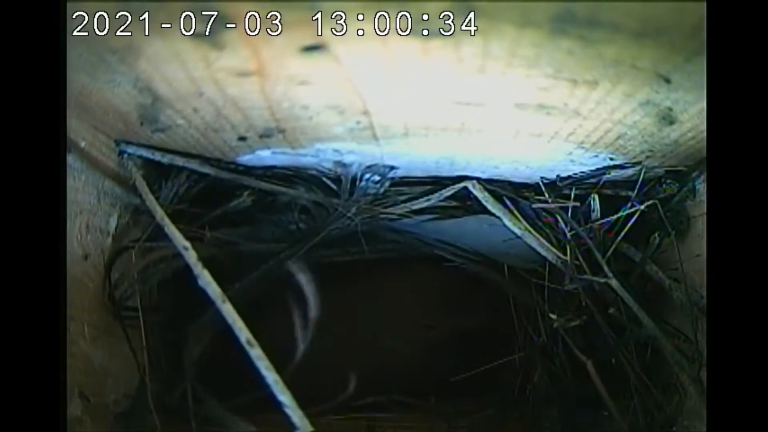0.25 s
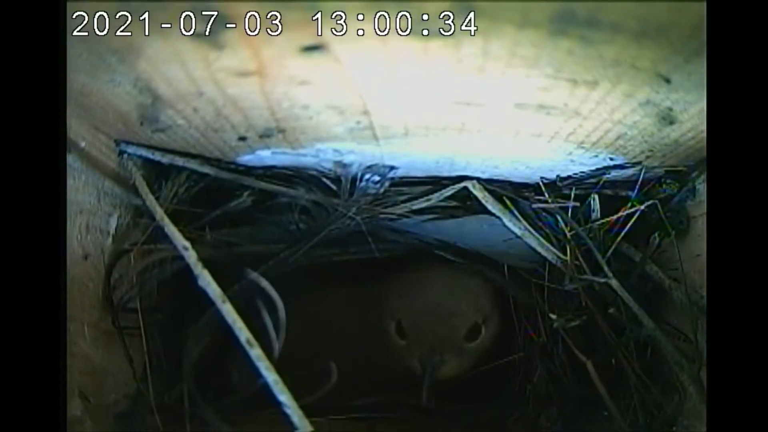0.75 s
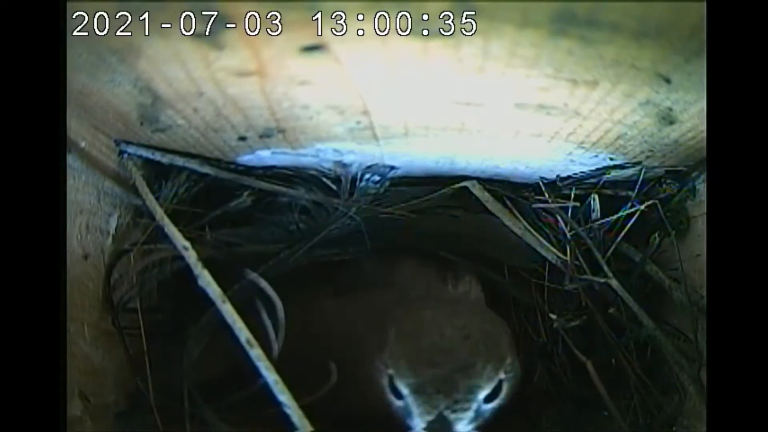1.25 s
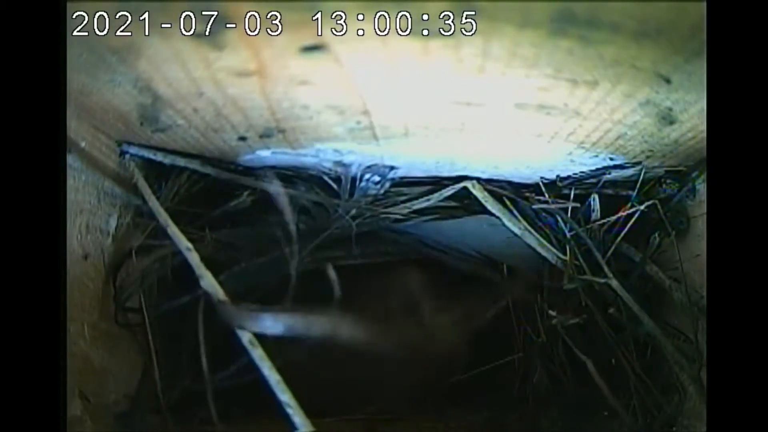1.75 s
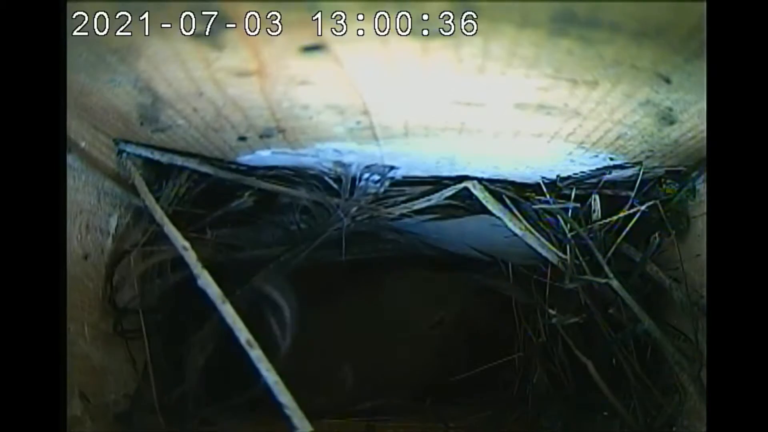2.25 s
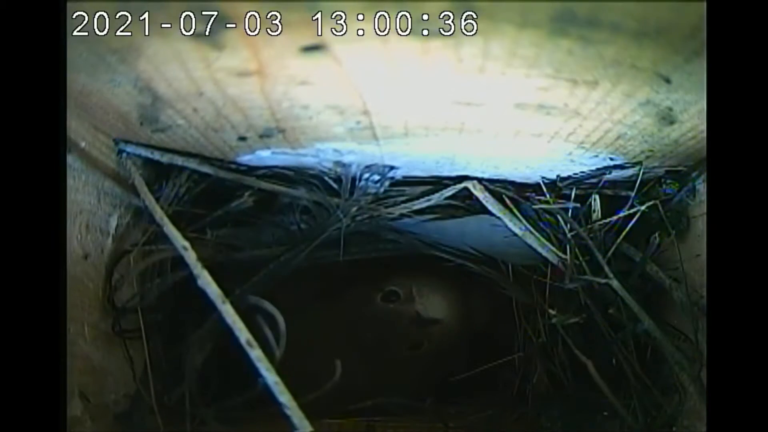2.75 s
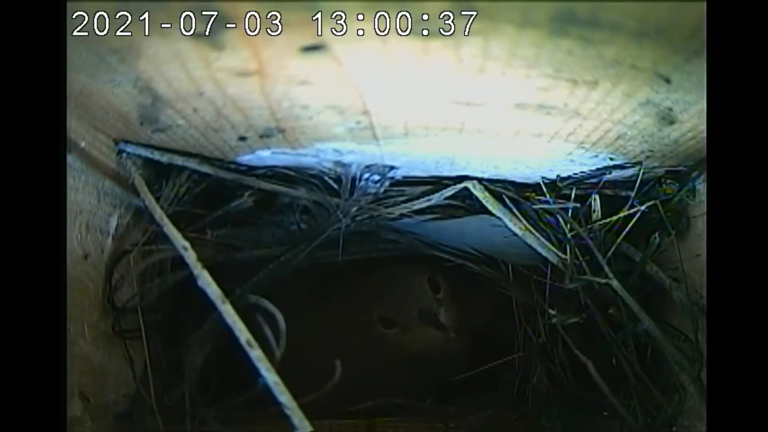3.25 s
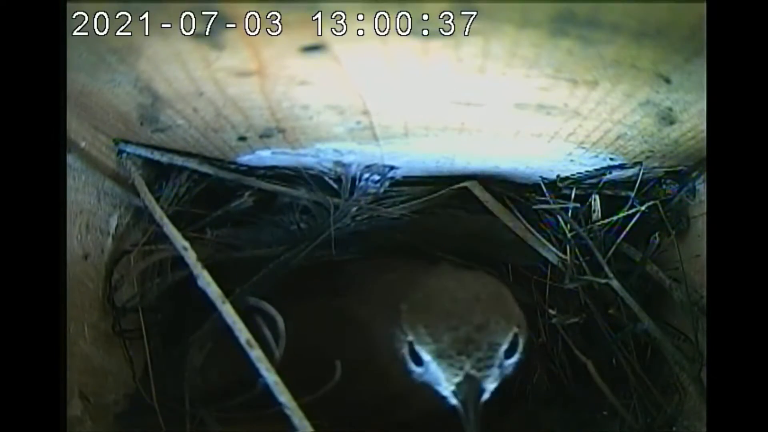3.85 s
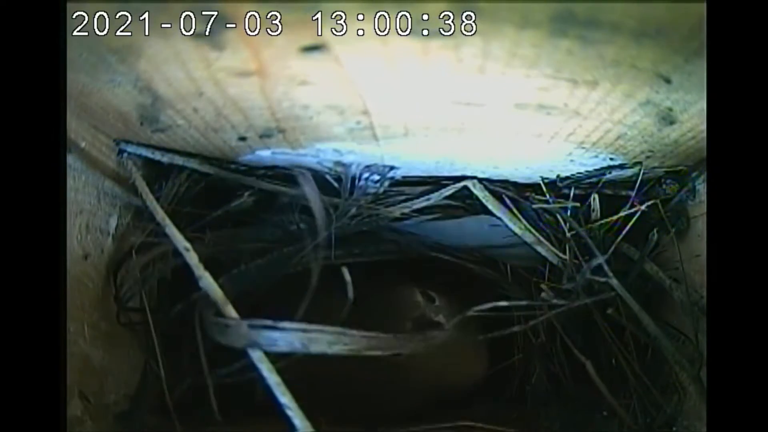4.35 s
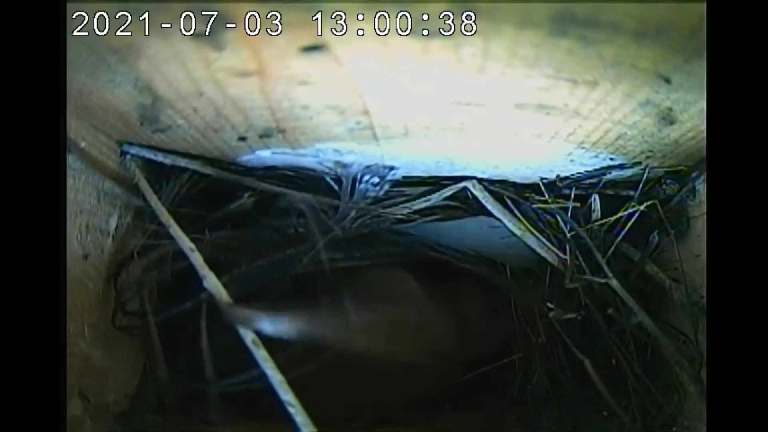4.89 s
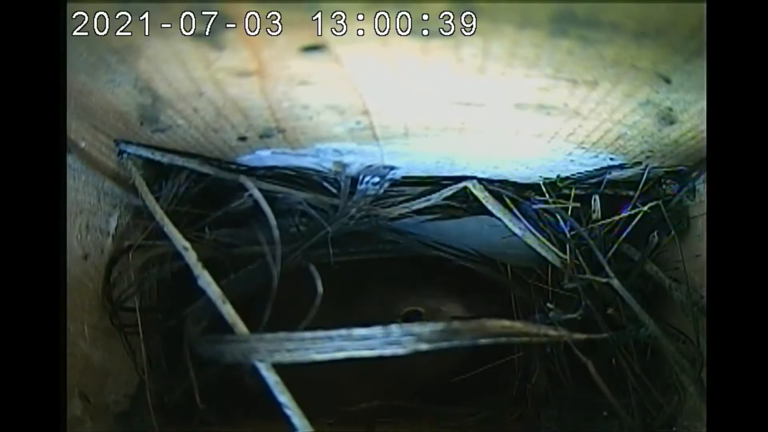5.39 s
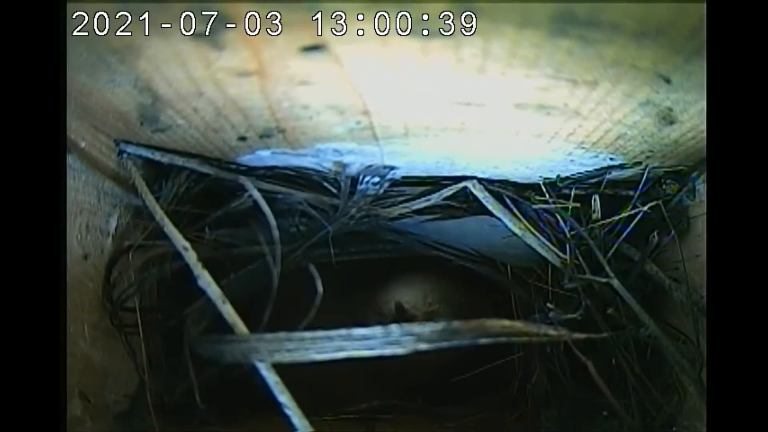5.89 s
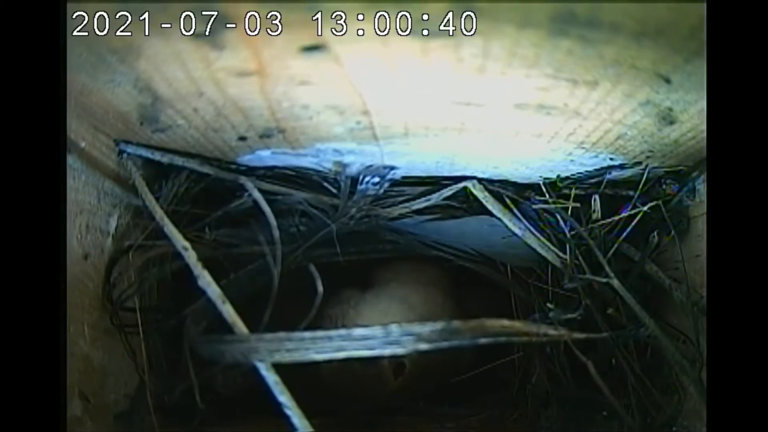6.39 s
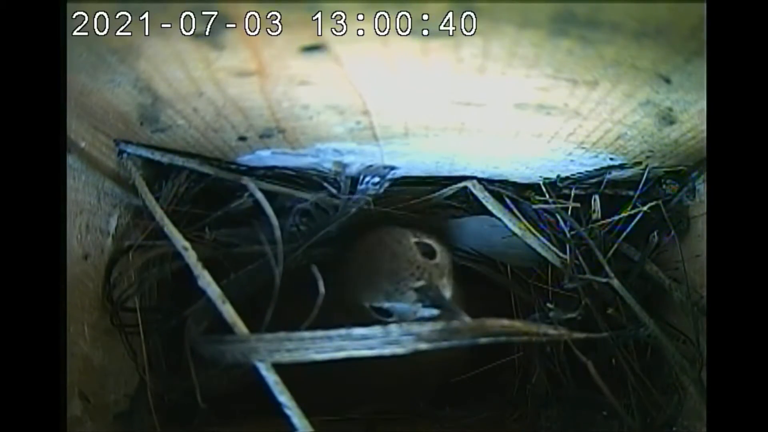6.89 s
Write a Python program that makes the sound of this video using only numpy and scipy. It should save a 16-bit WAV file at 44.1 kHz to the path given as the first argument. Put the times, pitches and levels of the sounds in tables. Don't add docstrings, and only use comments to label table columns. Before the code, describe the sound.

A low steady electrical buzz, very thin high whine, dull rumble and soft hiss run throughout, picked up by a small microphone inside a wooden nest box; the left side dominates and the right is only a faint leak. From 0 to 0.3 s dry straw scrapes, crackles and taps the walls, then almost nothing but a tiny rustle near 0.65. From 1.5 to 2.4 s a busier bout of hollow thuds, ticks and snaps ends with a sharp stalk break. At 2.45 s a wren outside begins hoarse churrs, then quick varied chatter and squeaks. From 3.7 s it grows loud: wavering warbles alternate with clear piercing whistles, then a rapid even trill from 4.3 to 4.9 and two warbled, rising closing phrases until about 5.2. Straw crackles beneath from 4.2 to 5.4, with strong taps around 5. Short ringing and a garden tail fade; faint ticks follow near 5.65 and 6.75-6.95, over the hum.

```python
import sys
import numpy as np
from scipy import signal
from scipy.fft import rfft, irfft, next_fast_len
from scipy.io import wavfile
from scipy.ndimage import uniform_filter1d, map_coordinates

SR = 44100
rng = np.random.default_rng(int(sys.argv[2]) if len(sys.argv) > 2 else 0)


def volts_from_db(level):
    exponent = np.asarray(level, float) / 20
    return 10 ** exponent


def materialize(psi):
    bounded = np.clip(np.atleast_2d(psi).T, -1, 1)
    quanta = np.round(bounded * 32767).astype(np.int16)
    wavfile.write(sys.argv[1], SR, quanta)


N = 314433


def unit(x):
    return x / np.sqrt(np.mean(x ** 2) + 1e-20)


def along(points, hz):
    f, v = np.transpose(points)
    return np.interp(np.log(hz + 1), np.log(f + 1), v)


def wobble(rate, size=N):
    knots = rng.standard_normal(int(size * rate / SR) + 4)
    return map_coordinates(knots, [np.arange(size) * rate / SR])


def filtered(x, response):
    m = next_fast_len(N + SR // 2)
    return irfft(rfft(x, m) * response(np.fft.rfftfreq(m, 1 / SR)), m)[..., :N]


# [f/Hz, width/Hz, level/dB]
BOX = [(307.4, 44.3, 3), (539.5, 30.8, 6), (1346, 108.8, 6.5), (2014.4, 53.1, 16.5), (3092, 249, 2.5),
       (4512, 63.3, 7.5), (6288, 63, -8.5), (11050, 129, -33.5), (10870, 550, -24)]


def box(f, widen):
    total = 0
    for k, (c, width, db) in enumerate(BOX):
        damping = 1j * f * width * widen
        total = total + (-1) ** k * volts_from_db(db) * damping / (c * c - f * f + damping)
    return total


# [t/s, length/s, crackle level/dB, push level/dB]
STRAW = [(0, 0.0248, -50, -49.5), (0.007, 0.271, -55, -52.5), (0.2, 0.0333, -50, -42),
         (0.231, 0.0467, -51, -53), (1.53, 0.0755, -50.5, -51), (1.589, 0.088, -54.5, -49),
         (1.679, 0.132, -67.5, -57.5), (1.728, 0.0462, -50.5, -45.5), (1.767, 0.0795, -54, -49.5),
         (1.847, 0.104, -52, -49.5), (1.927, 0.144, -52, -49), (2.054, 0.1437, -51.5, -50.5),
         (2.227, 0.0534, -59, -60), (2.258, 0.075, -50, -49), (2.351, 0.0237, -52, -53.5),
         (2.363, 0.0279, -41.5, -42), (2.386, 0.0432, -55.5, -48.5), (2.487, 0.046, -79, -49),
         (4.23, 0.0255, -46.5, -46), (4.257, 0.055, -54, -59.5), (4.309, 0.0776, -49.5, -45.5),
         (4.373, 0.076, -71, -56.5), (4.473, 0.0408, -52.5, -45.5), (4.514, 0.097, -57, -46.5),
         (4.61, 0.053, -75, -70), (4.708, 0.0498, -53.5, -47), (4.762, 0.0419, -47, -43.5),
         (4.82, 0.084, -55.5, -50.5), (4.896, 0.0296, -51, -53), (4.928, 0.1155, -49, -47),
         (5.042, 0.2065, -53.5, -54.5), (5.237, 0.0627, -50, -53.5), (5.3, 0.139, -69, -67.5),
         (5.633, 0.052, -65.5, -57.5), (0.652, 0.068, -65, -59.5), (6.74, 0.069, -71.5, -60)]


def straw():
    strokes = np.zeros((2, N))
    for s, length, crackle_db, push_db in STRAW:
        swell = signal.windows.tukey(int(1.35 * length * SR), .3)
        swell = swell * volts_from_db(2.5 - 17 * np.linspace(0, 1, len(swell)) ** 2)
        start = round(s * SR)
        strokes[:, start:start + len(swell)] += swell * volts_from_db([[crackle_db], [push_db]])
    clumps = volts_from_db(2 * wobble(45) + 2.2 * wobble(200))
    thud = filtered(clumps * rng.standard_normal(N), lambda f: box(f, 1.424) / (1 + (f / 750) ** 6))
    contacts = (rng.random((2, N)) < .1) * rng.standard_normal((2, N))
    thick, thin = contacts * volts_from_db(1.5 * rng.exponential(size=(2, N)))
    grains = filtered(thick, lambda f: f < 3700) + filtered(thin, lambda f: f >= 3700)

    def against_walls(f):
        low_cut = (f / 1150) ** 6 / (1 + (f / 1150) ** 6)
        return box(f, 3.83) * low_cut + volts_from_db(-13.5)

    crackle = filtered(clumps * grains, against_walls)
    return strokes[0] * unit(crackle) + strokes[1] * unit(thud)


# [f/Hz, level/dB per Hz]
AIR_SPECTRUM = [(12, -37.5), (20, -4), (49, -16.5), (123, -2.5), (300, -4.5), (408, -14.5), (539, -12),
                (942, -29),
                (2370, -24.5), (3400, -36.5), (8090, -37.5), (9560, -39.5), (12600, -37.5), (13700, -43.5),
        (14800, -30.5), (15800, -23.5)]


def air():
    z = signal.stft(rng.standard_normal(N), nperseg=512)[2]
    over_hz = uniform_filter1d(rng.standard_normal(z.shape), 6, 0)
    patches = unit(uniform_filter1d(over_hz, 14, 1))
    noise = signal.istft(z * volts_from_db(1.86 * patches), nperseg=512)[1][:N]

    def colour(f):
        ringing = volts_from_db(-0.5) * np.abs(box(f, 0.74)) * (f > 3500)
        return volts_from_db(along(AIR_SPECTRUM, f)) * (1 + ringing)

    return volts_from_db(-51) * volts_from_db(.5 * wobble(3)) * unit(filtered(noise, colour))


# [f/Hz, rms level of a line/dB]
BUZZ = [(60, -54), (120, -55.5), (300, -67.5), (600, -80), (1500, -84), (4000, -97.5), (9000, -112)]
# [f/Hz, rms level of a line/dB]
SIZZLE = [(9000, -104), (12800, -99), (13700, -89), (14300, -92), (14700, -89), (15300, -83.5),
          (15450, -79), (15800, -86)]
# [multiple of the field rate, rms level/dB]
WHISTLE_LINES = [(131.25, -86.5), (261.5, -68), (262.5, -63)]
EDGES = (.45, .75)
TOP_HZ = 15790


def picture():
    field_hz, steps = 59.878, 2 ** 15
    half = np.arange(int(2 * TOP_HZ / field_hz)) / 2
    hz = half * field_hz
    first, second = np.exp(-2j * np.pi * np.outer(EDGES, half))
    buzz = volts_from_db(along(BUZZ, hz)) * (first - 0.177 * second)
    sizzle = volts_from_db(along(SIZZLE, hz)) * (first + 1.48 * second)
    lines = np.where(half % 1 == 0, buzz, sizzle)
    lines[0] = 0
    frame = irfft(lines, steps) * steps / np.sqrt(2) / 1.312
    fields = field_hz * np.arange(N) / SR + .0003 * wobble(12)
    leak = np.interp(fields / 2 % 1 * steps, np.arange(steps), frame)
    for k, db in WHISTLE_LINES:
        leak += np.sqrt(2) * volts_from_db(db) * np.cos(2 * np.pi * k * (fields - .6))
    return leak * volts_from_db(.4 * wobble(4))


def right_hiss():
    return volts_from_db(-102) * filtered(rng.standard_normal(N), lambda f: (f / 7000) ** 2 / (1 + (f / 11000) ** 8))


# [t/s, peak level/dB]
TICKS = [(0.0159, -45.5), (0.0613, -43.5), (0.0987, -38), (0.1997, -32), (0.2402, -34), (0.6634, -54.5),
         (0.9456, -49), (1.5652, -47.5), (1.5731, -27), (1.5998, -34), (1.627, -41.5), (1.6588, -46),
         (1.8634, -39), (1.922, -38.5), (1.944, -31.5), (1.9689, -35.5), (1.9985, -36.5), (2.0167, -42.5),
         (2.0867, -35.5), (2.124, -35), (2.143, -35.5), (2.2115, -38), (2.2754, -35), (2.2921, -32.5),
         (2.3933, -32), (4.4938, -34.5), (4.9044, -41), (4.9275, -29), (5.0253, -25.5), (5.0881, -23),
         (5.2675, -33), (5.6224, -50.5), (5.6752, -55.5), (6.7408, -53), (6.8034, -51), (6.9586, -47)]


def taps():
    level_db, t60_s = -3, .009
    t = np.arange(400) / SR
    bursts = np.zeros(N)
    for s, db in TICKS:
        tap = volts_from_db(db + level_db - 60 * t / t60_s) * rng.standard_normal(len(t))
        bursts[round(s * SR):][:len(t)] += tap
    return filtered(bursts, lambda f: box(f, 7) * np.clip(f / 3300, 0, 1) ** 1.5)


# [t/s, peak level/dB, body
# level/dB]
SNAPS = [(0.2107, -50.5, 8.5), (1.539, -56, 4), (1.731, -47, 16.5), (1.7834, -49.5, 21.5),
         (1.8795, -49, 24.5), (2.3634, -45, -1.5), (2.3813, -41.5, 16), (3.108, -47, -9),
         (3.679, -41.5, -20), (3.8017, -38, -30.5), (4.033, -49.5, -2.5), (4.2366, -39.5, -15.5),
         (4.483, -38, -11.5), (4.6445, -56.5, 0), (4.7207, -37.5, -10), (4.7771, -48, 3.5),
         (5.252, -61.5, 11), (5.39, -58.5, 18.5)]


def snaps():
    t60_s = 0.0227
    t = np.arange(400) / SR
    direct, body = np.zeros((2, N))
    for s, db, body_db in SNAPS:
        burst = volts_from_db(db - 60 * t / t60_s) * rng.standard_normal(len(t))
        direct[round(s * SR):][:len(t)] += volts_from_db(-3) * burst
        body[round(s * SR):][:len(t)] += volts_from_db(body_db - 8.5) * burst
    return direct + filtered(body, lambda f: box(f, 0.76))


# [t/s, peak level/dB, f/Hz]
STALK = (2.3652, -20, 4300)


def breaking_stalk():
    s, db, hz = STALK
    t = np.arange(400) / SR
    out = np.zeros(N)
    ping = np.sin(2 * np.pi * hz * t * (1 - 58 * t))
    out[round(s * SR):][:len(t)] += volts_from_db(db - 60 * t / .008) * ping
    return out


# [f/Hz, width/Hz, level/dB]
PASSAGE = [(1400, 300, -9), (2050, 500, 0), (2950, 450, -.5), (4380, 400, 3), (6350, 450, 3)]


def syllable(shape, hoarse, strongest=1, fall_db=35, throb=0):
    passage_top_hz, reach_db, round_ms, harmonics = 7800, 45, 1.8, 6
    ms, hz, level_db = np.array(shape).T
    t = np.arange(int(ms[-1] * SR / 1000)) * 1000 / SR
    size = len(t)
    glide = uniform_filter1d(np.interp(t, ms, hz), size=int(round_ms * SR / 1000))
    k = np.arange(1, min(harmonics, strongest + reach_db / fall_db) + .01)[:, None]
    f = k * glide
    passage = sum(volts_from_db(db) / (1 + ((c * c - f * f) / (f * w)) ** 2) for c, w, db in PASSAGE)
    share = volts_from_db(-fall_db * np.abs(k - strongest)) * passage
    share = share / (1 + (f / passage_top_hz) ** 16)
    share = share / np.linalg.norm(share, axis=0)
    pitch = glide * (1 + rng.normal(0, 0.00613) + 0.0808 * hoarse * wobble(514.8, size))
    roughness = np.array([wobble(600, size) for _ in k])
    shaken = 1 + hoarse * roughness + .11 * wobble(1800, size)
    phase = 2 * np.pi * np.cumsum(pitch) / SR
    tone = volts_from_db(np.interp(t, ms, level_db)) * np.sum(share * shaken * np.sin(k * phase), axis=0)
    beat = 1 + throb * np.sin(2 * np.pi * 105 * t / 1000 + .5 * wobble(33.5, size))
    fade = np.clip(np.minimum(t - ms[0], ms[-1] - t) / 2, 0, 1)
    return np.sqrt(2) * tone * beat * fade


def garden_tail(dry):
    t = np.arange(SR // 4) / SR
    t60_s = np.array([[.02], [.2]])
    walls, garden = rng.standard_normal((2, len(t))) * volts_from_db(-60 * t / t60_s)
    tail = volts_from_db(-14) * walls / np.linalg.norm(walls) + volts_from_db(-25) * garden / np.linalg.norm(garden)
    return signal.fftconvolve(dry, tail)[:N]


# [t/ms, f/Hz, level/dB]
CHURR = [(0, 860, -63), (25, 930, -51), (46, 1000, -45), (65, 940, -63)]
LONG_CHURR = [(0, 880, -64), (14, 940, -49), (92, 980, -47), (102, 1090, -46), (118, 1070, -58)]
CHUCK = [(0, 1500, -62), (10, 1600, -45), (19, 1330, -48), (25, 1020, -45), (30, 850, -47), (36, 680, -56)]
ARCH = [(0, 1150, -60), (9, 1300, -57), (16, 1600, -52), (24, 1950, -47), (32, 2150, -45), (40, 2080, -44),
        (52, 1800, -43), (60, 1750, -64)]
ARCH_TOP = [(28, 6150, -62), (36, 6150, -56), (41, 6190, -52), (45, 6000, -57), (50, 5600, -53),
            (57, 4970, -53), (64, 4660, -66)]
HOOK = [(0, 600, -59), (8, 810, -43), (12, 790, -41), (19, 690, -43), (24, 750, -50), (31, 710, -46),
        (40, 690, -59)]
FLICK = [(0, 1480, -70), (8, 4300, -55), (11, 4900, -45), (22, 4350, -49), (34, 4150, -57)]
RASP = [(0, 1570, -57), (10, 1550, -46), (30, 1550, -44.5), (38, 1320, -44), (43, 1380, -44),
        (52, 1160, -51)]
PIP = [(0, 1900, -61), (6, 1970, -41), (12.5, 2060, -37), (19, 2000, -44), (24, 2000, -70)]
LOOP = [(3, 2200, -60), (9.5, 3170, -42), (15, 3520, -50), (21, 3270, -43), (25, 2650, -59),
        (30, 2260, -38), (33, 2070, -34), (40, 1680, -41), (46, 1480, -51)]
DIP = [(0, 1080, -55), (6, 1200, -40), (13, 1130, -39), (23, 930, -45), (34, 1310, -37), (41, 1470, -36),
       (47, 1370, -39), (52, 1420, -60)]
SQUEAK = [(0, 1880, -62), (5.5, 4390, -48), (8.5, 5610, -54), (11, 6430, -30), (14.5, 6470, -44),
          (20, 6480, -24), (27.4, 6280, -26), (30, 6260, -47), (60, 6320, -58)]
CHEW = [(0, 920, -60), (8.5, 1040, -41), (13.5, 1100, -36), (19.5, 1160, -39), (23.4, 1230, -40),
        (28, 1090, -32), (34.4, 930, -35), (42, 790, -52)]
TICK_UP = [(0, 6740, -53), (3.5, 6280, -40), (6.5, 5480, -53), (8.5, 4900, -36), (11, 4380, -29),
           (14, 4150, -44), (23.4, 4560, -41), (33, 5050, -48), (48, 5250, -51)]
# [t/ms, f/Hz, level/dB]
WARBLE = [(0, 2300, -50), (3, 2300, -40), (8, 1930, -39), (14, 2550, -34), (18, 2000, -34.5),
          (24.5, 2900, -34.5), (31, 2480, -33.5), (38, 1950, -30), (40, 1850, -50)]
LEAP = [(0, 1700, -56), (3, 3000, -50), (6.5, 4300, -36), (9, 4600, -31.5), (13.5, 4450, -33),
        (16.5, 4050, -43), (19.5, 3700, -46)]
WHISTLE_PUFF = [(0, 4300, -62), (5, 4500, -48), (19, 4550, -43), (27, 4300, -58)]
WHISTLE = [(17, 3800, -46), (21, 3520, -31), (25.5, 3360, -23.5), (33, 3200, -22), (39, 3150, -29),
           (44, 3100, -48)]
TRILL_LEAD = [(0, 3050, -44), (3, 3300, -39), (6, 3150, -46)]
TRILL = [(4.5, 3200, -44), (7.5, 3330, -30), (9.3, 2900, -36), (12, 3270, -29), (14, 3450, -32),
         (16.5, 2980, -23), (19, 2530, -30.5), (28, 2240, -34), (34, 2030, -52)]
BROKEN_HUMP = [(1, 1950, -50), (5.5, 1900, -41), (9, 1850, -54), (13, 1900, -41), (17, 2200, -35),
               (25, 2600, -36), (31, 2350, -34), (34, 1950, -41), (36, 1900, -54)]
HUMP = [(0, 2300, -48), (5, 2050, -35), (9, 1960, -39), (13, 2300, -37), (21, 2760, -36), (27, 2300, -35),
        (31, 2000, -38), (34, 1900, -54)]
SECOND_HUMP = [(42, 2800, -50), (47, 3120, -36), (53, 2850, -27.5), (57, 2560, -33), (63, 2250, -38),
               (69, 2000, -48)]
RISE = [(70, 2950, -50), (78, 3170, -36), (83, 3270, -31.5), (93, 3430, -33), (96, 3500, -47),
        (103, 3620, -44), (120, 3600, -55)]
VOICES = {"churr": (-7.5, CHURR, .8, 2.5, 5, .4), "long churr": (-7, LONG_CHURR, .5, 2.6, 3.5, .6),
          "chuck": (-3, CHUCK, .3, 1.9, 3), "arch top": (-1, ARCH_TOP, .7), "arch": (-9, ARCH, .14, 1.5, 9),
          "loop": (-6, LOOP, .2, 1.9, 4), "chew": (-9, CHEW, .2, 2.9, 7), "hook": (-15, HOOK, .4, 3.4, 6),
          "flick": (-16, FLICK, .21, 1, 5), "rasp": (-6, RASP, .7, 1.9, 8, .6),
          "dip": (-11, DIP, .18, 2.1, 6), "pip": (-14, PIP, .2, 1, 14), "squeak": (-25.5, SQUEAK, .24),
          "tick": (-22, TICK_UP, .15), "warble": (-19.5, WARBLE, .12), "leap": (-16, LEAP, .28),
          "puff": (-5, WHISTLE_PUFF, .7), "whistle": (-33, WHISTLE, .1, 1, 44.5),
          "trill": (-22.5, TRILL, .12, 1, 42), "trill lead": (-15, TRILL_LEAD, .2),
          "hump": (-24.5, HUMP, .13), "broken hump": (-24.5, BROKEN_HUMP, .13),
          "second hump": (-24.5, SECOND_HUMP, .1, 1, 42), "rise": (-26, RISE, .07, 1, 42)}
# [notes of a syllable, [t/s, level/dB]]
CHATTER = [(["churr"], [(2.4552, -2)]), (["long churr"], [(2.56, -1.5)]), (["chuck"], [(2.7121, -0.5)]),
           (["arch", "arch top"], [(2.7839, -2), (2.8598, -0.5), (2.9396, -0.5)]), (["hook"],
           [(3.0169, 1)]), (["flick"], [(3.0838, 1)]), (["rasp"], [(3.138, -1)]), (["pip"], [(3.208, 0.5)]),
           (["loop"], [(3.2434, -0.5), (3.2988, -1.05), (3.3556, 0.5)]), (["dip"], [(3.412, 0.5)]),
           (["squeak"], [(3.4839, 0.5)]), (["chew"], [(3.5302, -1)]), (["tick"], [(3.5986, 0.5),
           (3.6699, 2)])]
# [notes of a syllable, [t/s, level/dB]]
CLIMAX = [
    (["warble"], [(3.7368, -1.55), (3.854, 0.25), (3.9688, 0.81), (4.0855, 0.66), (4.2057, 0.77)]),
    (["leap", "puff"], [(3.7948, 0), (3.9119, -2), (4.0251, -1), (4.1429, -4), (4.2625, -4.5)]),
    (["whistle"], [(3.7958, -2.64), (3.9119, -0.92), (4.0251, 0.81), (4.1429, 0.77), (4.2625, 1.7)]),
    (["trill lead", "trill"], [(4.3251, 2.15), (4.3728, 1.46), (4.8122, 0.43), (4.8647, -1)]),
    (["broken hump"], [(4.9331, 0.64)]),
    (["hump"], [(5.0902, 0.5)]),
    (["second hump"], [(4.9331, -0.46), (5.0902, 0.8)]),
    (["rise"], [(4.9325, 0.45), (5.0912, 0.24)]),
]


def wren():
    start_s, every_s, first_db, fade_db = 4.4205, .04863, 1.4, .2
    run = [(["trill lead", "trill"], [(start_s + n * every_s, first_db - n * fade_db) for n in range(8)])]
    dry, airy = np.zeros((2, N))
    for names, times in CHATTER + CLIMAX + run:
        for name in names:
            breath_db, *voice = VOICES[name]
            for s, db in times:
                note = volts_from_db(db) * syllable(*voice)
                dry[round(s * SR):][:len(note)] += note
                airy[round(s * SR):][:len(note)] += volts_from_db(breath_db) * np.abs(note)

    def haze(f):
        middle = volts_from_db(-4) / (1 + ((f - 3100) / 600) ** 2)
        low_cut = (f / 2700) ** 3 / (1 + (f / 2700) ** 3)
        return (box(f, 6) + middle) * low_cut

    breath = unit(filtered(rng.standard_normal(N), haze))
    lingering = signal.lfilter([.0006], [1, -.9994], airy)
    puffs = uniform_filter1d(airy, size=300) * .7 + .9 * lingering
    dry = dry + breath * volts_from_db(2.5 * wobble(50)) * puffs
    dry = dry + volts_from_db(-9) * filtered(dry, lambda f: box(f, .4) * (f > 3800))
    answer = filtered(dry, lambda f: box(f, 3) * (f > 4000))
    dry[400:] += volts_from_db(-13) * answer[:-400]
    return dry + garden_tail(dry)


def scene():
    mate = straw() + taps() + snaps() + breaking_stalk()
    heard = mate + air() + picture() + wren()
    early = .7 / SR
    leak = filtered(heard, lambda f: np.exp(2j * np.pi * f * early) / (1 + .3 * (f / 9000) ** 2))
    return np.array([volts_from_db(5.4) * heard, volts_from_db(-17.3) * leak + right_hiss()])


def top_cut(x):
    return signal.sosfilt(signal.butter(12, 16730, fs=SR, output="sos"), x)


def record(dry):
    mix = filtered(dry, lambda f: f < TOP_HZ)
    return top_cut(mix)


dry = scene()
out = record(dry)
materialize(out)
```